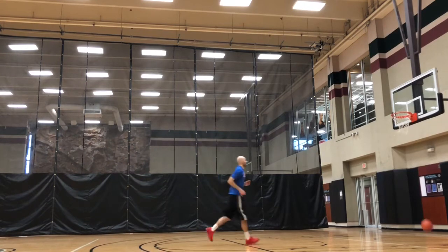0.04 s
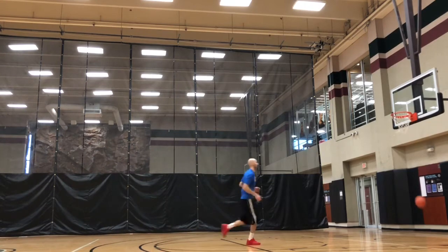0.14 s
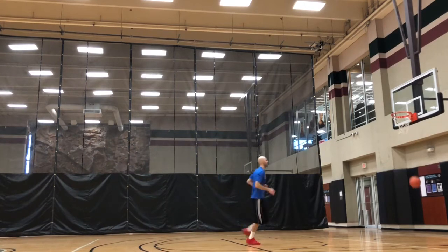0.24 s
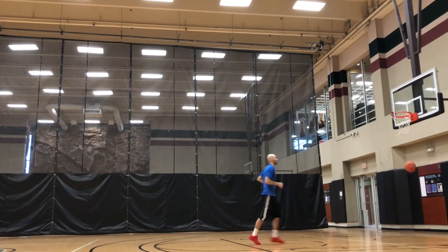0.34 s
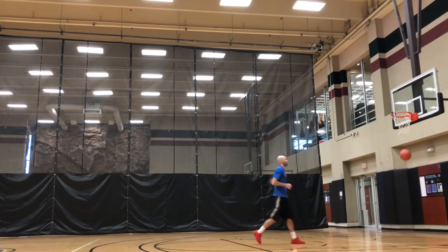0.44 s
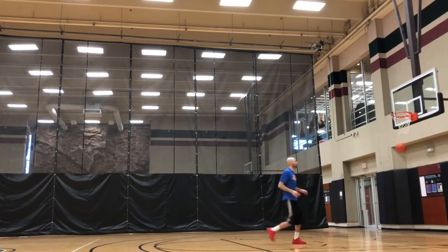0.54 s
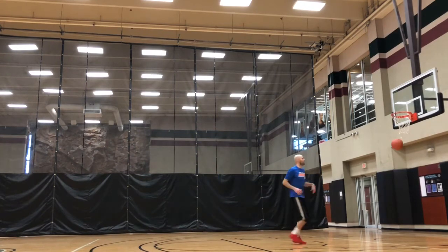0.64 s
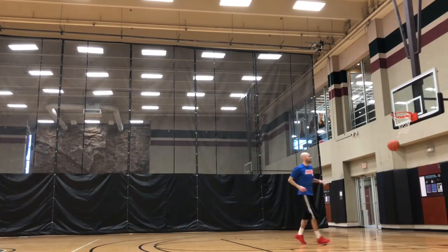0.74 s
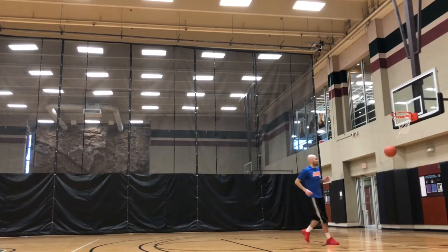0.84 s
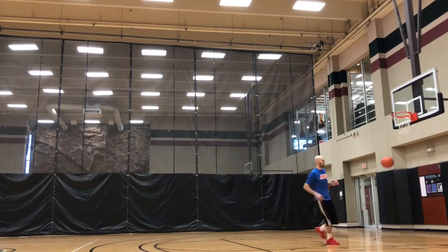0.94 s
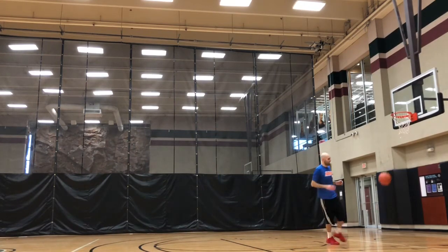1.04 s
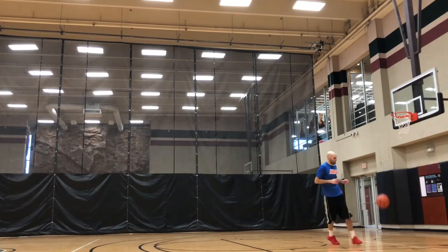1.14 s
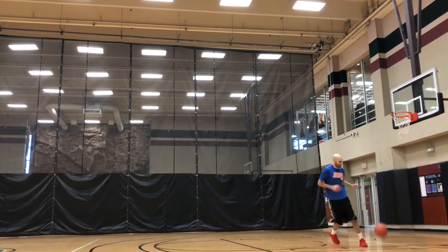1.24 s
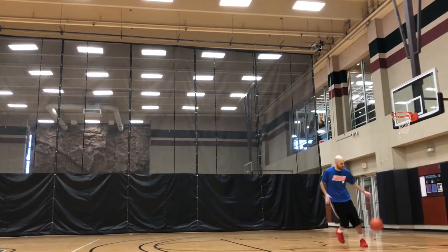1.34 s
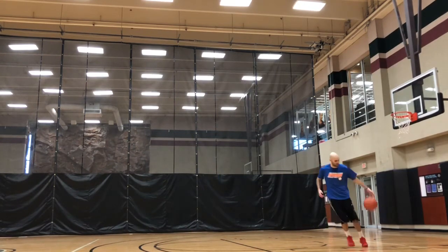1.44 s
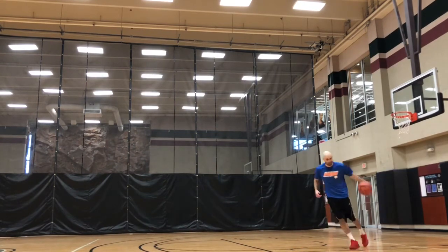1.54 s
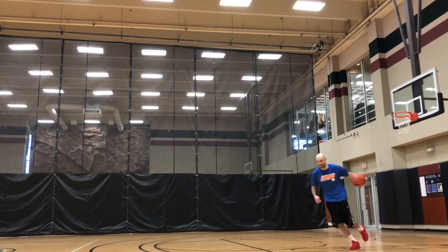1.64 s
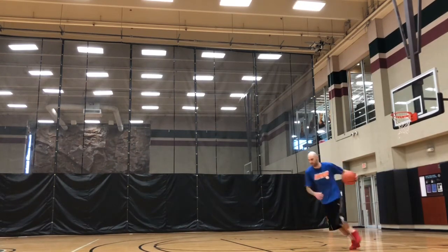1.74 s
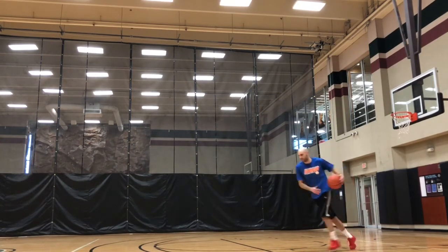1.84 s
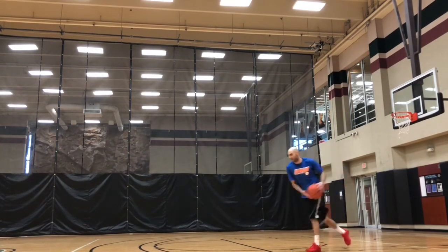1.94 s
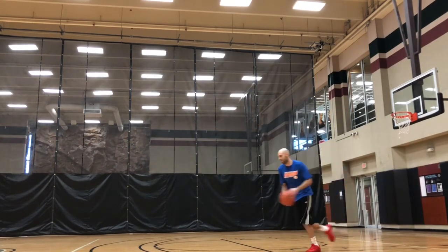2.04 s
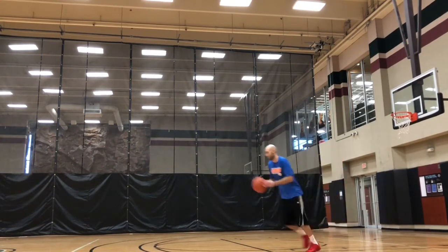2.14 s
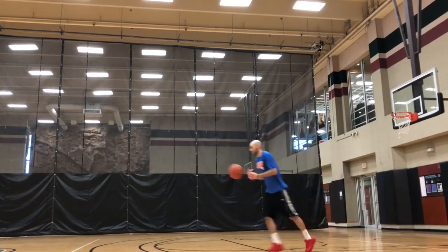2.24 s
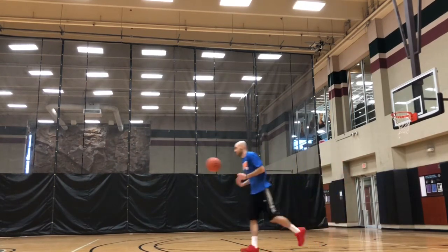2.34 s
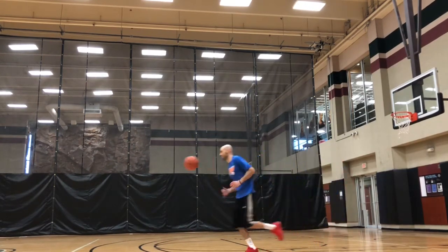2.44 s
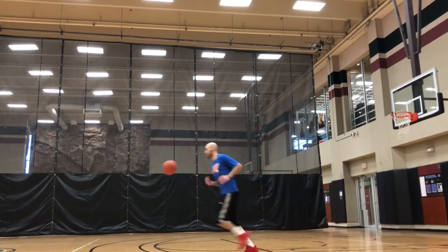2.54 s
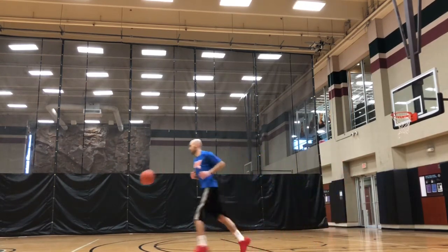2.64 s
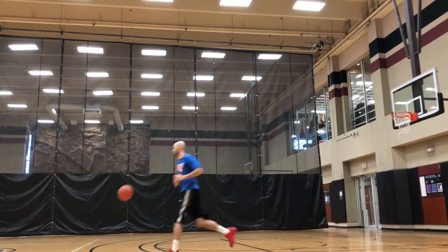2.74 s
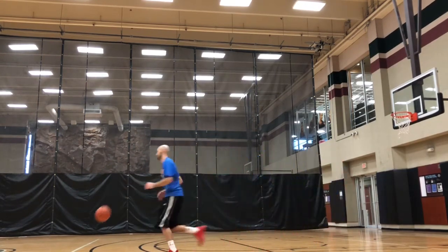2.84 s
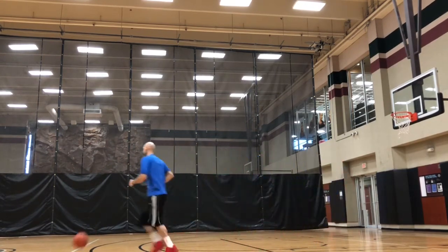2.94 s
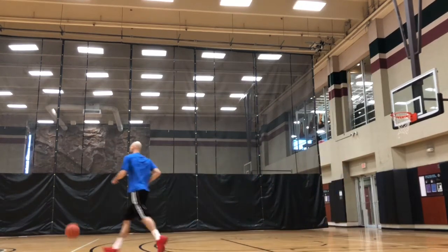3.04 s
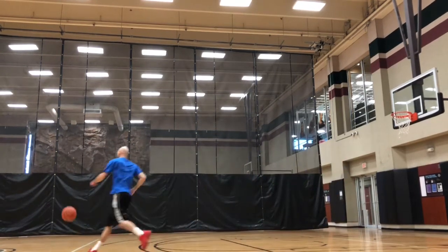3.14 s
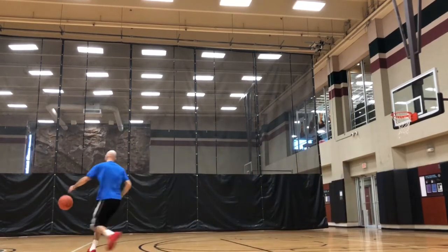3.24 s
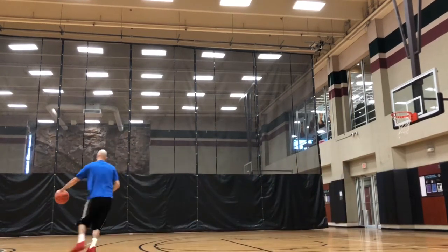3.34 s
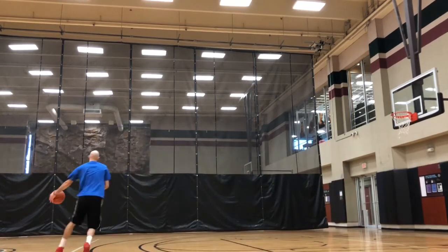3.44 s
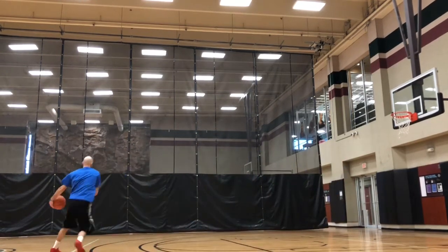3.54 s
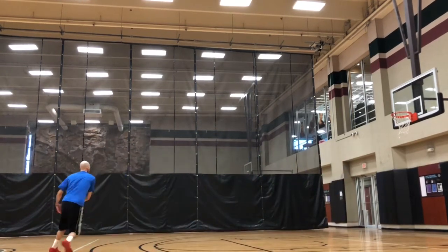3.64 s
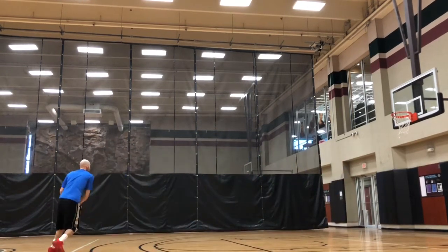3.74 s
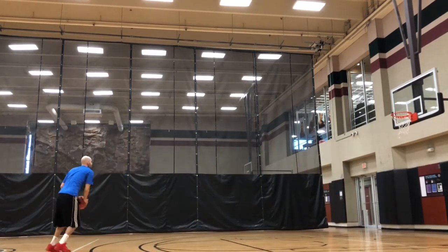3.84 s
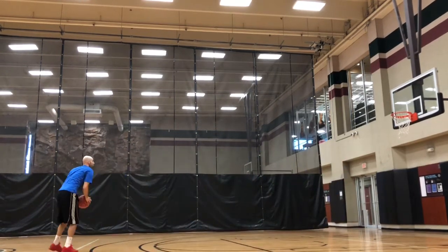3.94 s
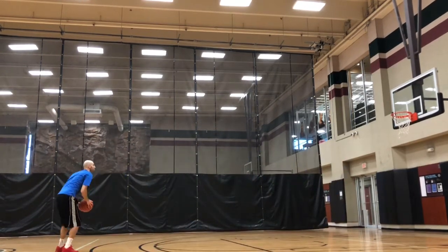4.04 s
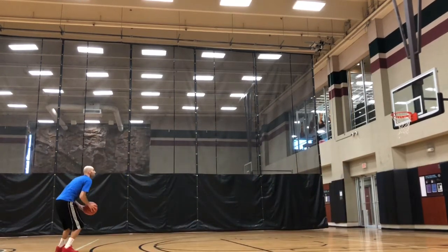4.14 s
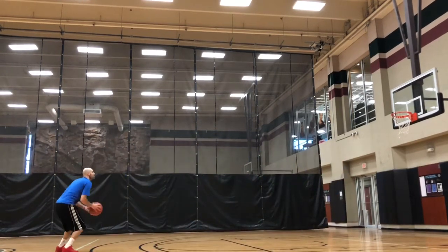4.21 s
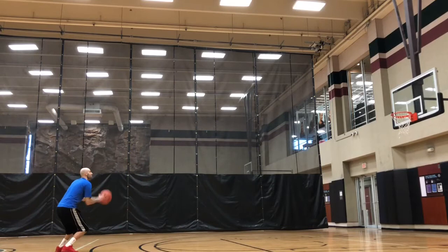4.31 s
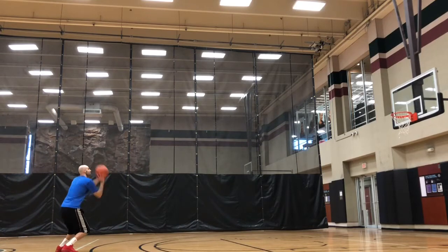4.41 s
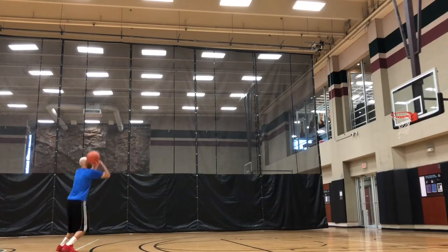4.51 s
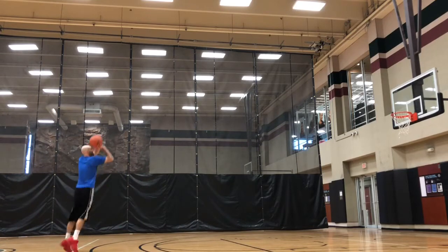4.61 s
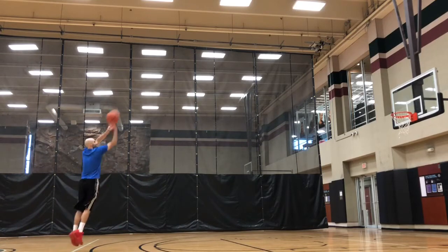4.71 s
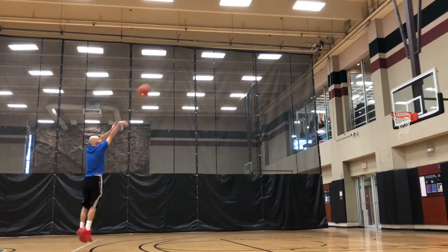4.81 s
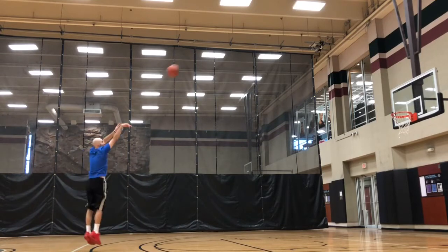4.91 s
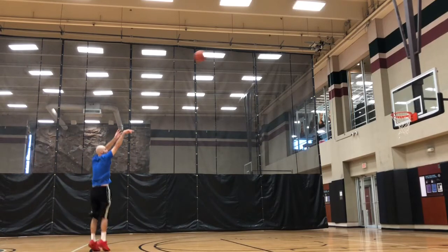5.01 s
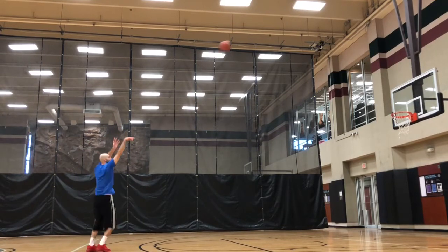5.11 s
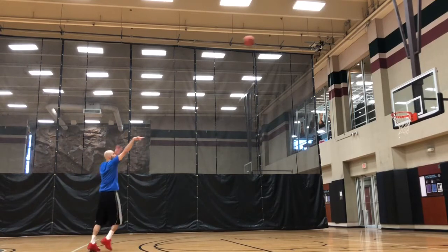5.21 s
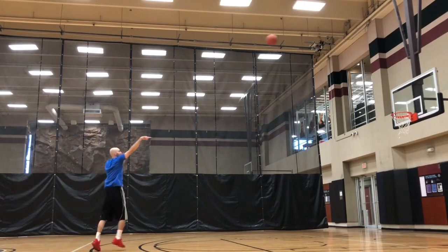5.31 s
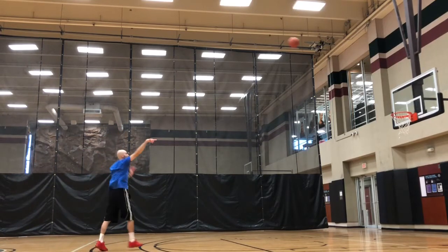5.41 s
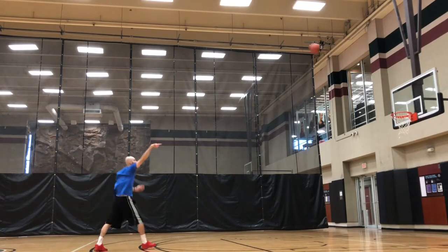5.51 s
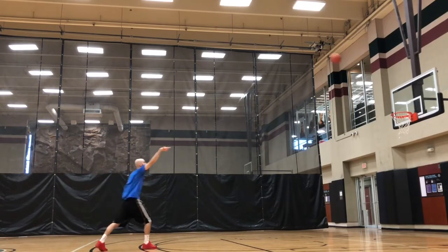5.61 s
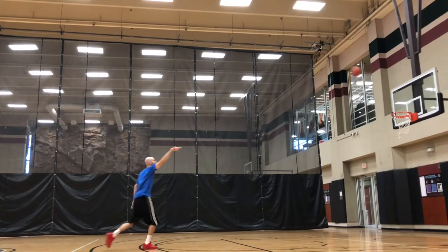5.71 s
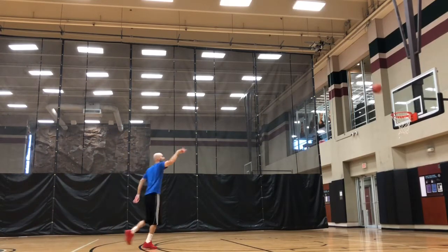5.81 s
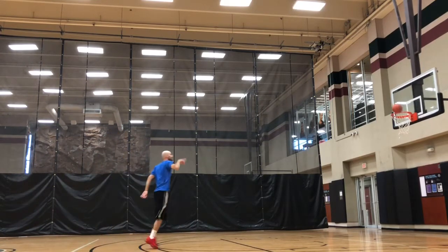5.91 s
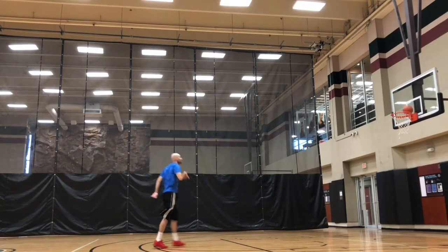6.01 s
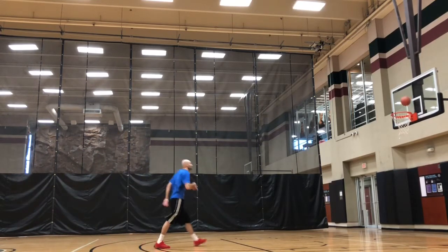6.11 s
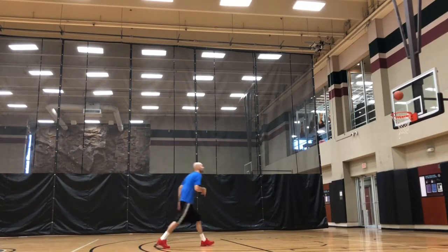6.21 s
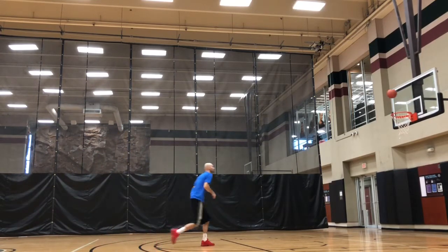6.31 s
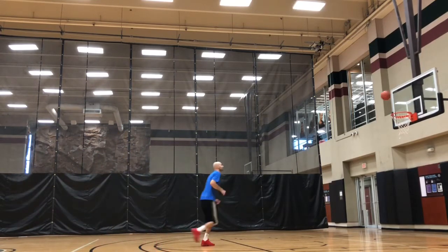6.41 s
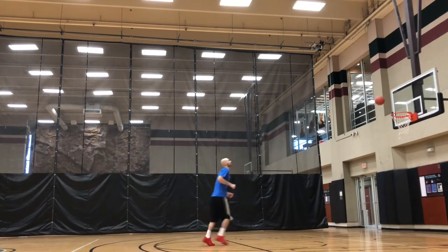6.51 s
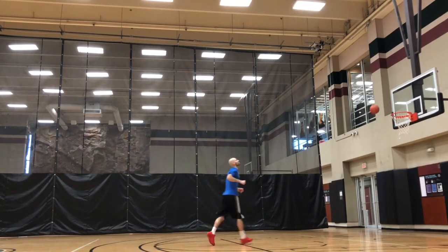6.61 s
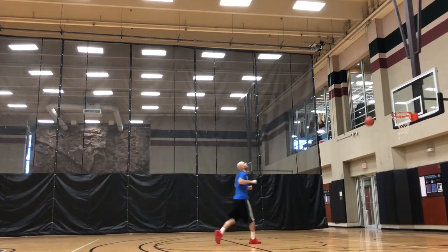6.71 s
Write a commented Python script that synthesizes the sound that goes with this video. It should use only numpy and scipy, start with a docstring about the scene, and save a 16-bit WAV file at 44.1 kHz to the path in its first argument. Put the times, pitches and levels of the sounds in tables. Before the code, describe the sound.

A basketball bounces three times on a wooden floor in a large empty gym, each sharp slap booming and echoing for seconds. Much softer footsteps, hand pats on the ball and swishing clothes follow the player, who lands from a jump with a thud. Then the ball hits the rim with a rattling clang that rings on. Ventilation rumbles quietly throughout, heard from near the floor.

```python
"""A basketball bounces three times in a big empty gym: its skin slaps, its shell rings, the sprung floor booms.
A player jogs after it with thudding soles and swishing clothes, catches it, jumps, shoots and lands.
The ball slams the steel rim: the hinge clatters, the backboard clanks and the ring sings on.
Every hit hangs in the hall for seconds, over a bed of ventilation rumble and faint lamp whine."""
import sys
import numpy as np
from scipy import signal
from scipy.fft import rfft, irfft, next_fast_len
from scipy.io import wavfile

SR = 44100
rng = np.random.default_rng(int(sys.argv[2]) if len(sys.argv) > 2 else 0)


def to_wav(s):
    """Save 16-bit WAV."""
    ch = np.atleast_2d(s).T  # columns
    pcm = np.round(np.clip(ch, -1, 1) * 32767)  # PCM
    wavfile.write(sys.argv[1], SR, pcm.astype(np.int16))


N = 297932

# Levels in the tables are relative; each layer sets its own gain.
# rumble of the ventilation: (frequency [Hz], level [dB])
VENT_COLOUR = [(15, -39), (25, -8), (80, 3), (127, -8.5), (206, -7), (384, -18), (516, -14.5), (575, -15.5),
               (1230, -26.5), (1940, -32.5), (2690, -35.5), (5140, -44), (7310, -53.5), (11000, -56.5),
               (16000, -57)]
# length of the hall's tail: (frequency [Hz], t60 [s])
HALL_DECAY = [(60, 3), (130, 2.5), (300, 3), (600, 4), (1300, 4.5), (2000, 3.5), (2800, 2.5), (4000, 1.8),
              (5500, 1.11), (8000, 0.94), (11000, 0.7), (14000, 0.7)]
# tone of the hall's tail: (frequency [Hz], level [dB])
TAIL_COLOUR = [(60, 3.5), (130, 7), (400, 4), (900, 6), (1900, -1.5), (3600, -4.5), (7000, -8.5),
               (14000, -16.5)]
# soft thud of a sole or a hand: (frequency [Hz], level [dB])
THUD_COLOUR = [(50, 11.5), (150, 13.5), (500, 15), (1000, 13), (2000, 11.5), (4500, 2), (8000, -11.5),
               (15000, -23.5)]
# footfalls: (time [s], level [dB], scuff t60 [s], brightness [dB/octave])
FOOTFALLS = [(0.527, -55, .14, 3.5), (2.040, -38.5, 0.058, -1.2), (2.827, -42, 0.061, 0.7),
             (3.616, -44, 0.29, -1.5), (5.1013, -35.5, 0.034, 0.5), (5.108, -39, 0.037, 0.5),
             (5.4907, -48, 0.21, -0.5)]
# hands on ball and clothes: (time [s], level [dB], brightness [dB/octave])
HAND_PATS = [(2.458, -36, -1.5), (2.883, -50, 4.5), (3.245, -30, -3), (4.053, -35, -1.6),
             (4.288, -56.5, 10), (4.830, -54, 9.5), (5.2384, -48, 3)]
# clothes swishing on the run: (time [s], length [s], level [dB])
CLOTH_SWISHES = [(0.86, 0.13, -66), (1.208, 0.18, -63), (2.302, 0.26, -64), (3.599, .45, -58.5),
                 (4.098, 0.57, -67)]
# hiss of rubbing cloth: (frequency [Hz], level [dB])
CLOTH_COLOUR = [(500, -5), (2500, 7.5), (6000, 2.5), (9000, -11), (15000, -11)]
# soles skidding, and the ball on the steel: (time [s], length [s], pitch [Hz], width [Hz], level [dB])
RUBBER_SKIDS = [(3.763, 0.41, 5260, 620, -59.5), (6.119, 0.027, 6400, 700, -38.5),
                (6.168, 0.032, 6800, 800, -42)]
# blows on the rim and its hinge: (time [s], clank level [dB], clatter level [dB], clatter t60 [s])
RIM_HITS = [(6.0172, -32.5, -32, 0.021), (6.0291, -24, -32, .09), (6.0412, -22, -34, .055),
            (6.0479, -15.5, -19, 0.04), (6.0936, -15.5, -30.5, 0.06), (6.1357, -21.5, -25, 0.03),
            (6.1764, -25, -35, .035)]
# crowded resonances of backboard and frame: (frequency [Hz], level [dB])
BACKBOARD_COLOUR = [(30, -7), (58, 7), (95, -1.5), (140, 1), (200, 0.5), (440, 1.5), (530, 1.5), (670, 3.5),
                    (850, 1), (1100, -2.5), (1400, -5), (1750, -12), (2700, -18.5), (4500, -24),
                    (9000, -41)]
# bright clatter of the hinge: (frequency [Hz], level [dB])
HINGE_COLOUR = [(200, -11), (1200, 3), (2000, -10), (3400, -0.5), (4300, -9.5), (5200, -1), (6800, -6.5),
                (8500, -11), (15000, -24.5)]
# steel ring and its bracket: (frequency [Hz], level [dB], t60 [s])
STEEL_MODES = [(141.9, -26, 1.1), (245.6, -28.5, 0.57), (335, -27, 1.4), (360, -25.5, 1.4),
               (445.6, -26, 2.3), (477, -33, 1.6), (621, -23.5, 2.5), (660, -22, 1.5), (685, -28, 3),
               (720, -25.5, 2), (747, -30, 3.2), (819, -28, 2.3), (1050, -23.5, 0.87), (1076, -20, 0.46),
               (1300, -35, 1.9), (1455, -23.5, 0.44), (1660, -54, 1.8), (1916, -47, 2.8), (1955, -43, 2.1),
               (2780, -40, 1), (2840, -45, .9), (3520, -49, .9), (4810, -54, .8), (6280, -50, .7),
               (6600, -46, 0.82), (6790, -46, .8)]
# boards and skin shuddering after the crack: (frequency [Hz], level [dB])
BOARD_COLOUR = [(100, -15), (300, 21), (600, -8), (1000, 8), (1700, -4), (3500, -27.5), (7000, -22),
                (15000, -24)]
# tick of the pebbled skin meeting the varnish: (frequency [Hz], level [dB])
PEBBLE_COLOUR = [(2000, -20), (7000, 0), (12000, 0), (16000, -2)]
# one slap, with a low hump from the floor and a high one from the skin: (frequency [Hz], level [dB])
SLAP_COLOUR = [(25, -14), (58, 34), (120, 34), (165, 25.5), (310, 21), (500, 20.5), (700, 13.5), (980, 14),
               (1350, 22), (2200, 18.5), (3400, 19), (5000, 7.5), (7800, 9.5), (15000, -8)]
# the ball's shell and the air inside it: (frequency [Hz], level [dB], t60 [s])
SHELL_MODES = [(181.6, -26.5, 0.21), (279.4, -23.5, 0.12), (466, -29, 0.18), (569, -25, 0.082),
               (839, -32, 0.13), (1116, -31.5, 0.15), (1198, -33.5, 0.12), (1327, -34.5, 0.12),
               (1420, -25.5, 0.056), (1525, -33, 0.12), (1880, -51, 0.09), (2920, -35, 0.079),
               (3660, -35, 0.092)]
# the ball on the floor: (time [s], level [dB], brightness [dB/octave], floor boom [dB], skin ping [dB],
# hall send [dB], lag of the quick second slap at lift-off [s], far wall lag [s])
FLOOR_BOUNCES = [(0.1162, 1.5, -0.8, 0.5, 0.5, 0.3, .0153, .033),
                 (1.379, -2, 0.08, 7, -0.5, -1.96, 0.0095, .0264),
                 (3.0705, -6, -1.5, -1, -7.5, 2.5, 0.009, .043)]


def amp(db):
    """Decibels to gain."""
    return 10 ** (np.asarray(db) / 20)


def unit_rms(x):
    """Scales to rms 1."""
    return x / np.sqrt(np.mean(x ** 2) + 1e-20)


def curve(points, hz):
    """Reads a table on a log-frequency axis."""
    f, value = np.transpose(points)
    return np.interp(np.log(hz + 1), np.log(f + 1), value)


def seconds(length):
    """A time axis."""
    return np.arange(int(length * SR)) / SR


def decay(t, t60):
    """An envelope that falls 60 dB in t60 seconds."""
    return 1e-3 ** (t / t60)


def add(mix, start, sound):
    """Mixes a sound in at a start time, which may lie before zero."""
    at = round(start * SR)
    sound, part = sound[max(-at, 0):], mix[max(at, 0):]
    part[:len(sound)] += sound[:len(part)]


def octaves(hz):
    """Octaves above the midrange pivot of the brightness tilt."""
    return np.log2((hz + 20) / 500)


def noise(colour, size, tilt=0):
    """Coloured noise of rms 1, tilted in dB per octave."""
    padded = next_fast_len(size)
    hz = np.fft.rfftfreq(padded, 1 / SR)
    white = rng.standard_normal((len(hz), 2)) @ [1, 1j]
    eq = amp(curve(colour, hz) + tilt * octaves(hz))
    return unit_rms(irfft(white * eq, padded)[:size])


def burst(colour, t60, tilt=0):
    """Crowded resonances, struck together and dying together."""
    return noise(colour, SR, tilt) * decay(seconds(1), t60)


def ring(modes, t):
    """Separate modes dying at their own speeds."""
    return sum(amp(db) * decay(t, t60) * np.sin(2 * np.pi * (hz * t + rng.random()))
               for hz, db, t60 in modes)


def whistle(hz, width_hz, size):
    """Noise in one narrow resonance."""
    detune = (np.fft.rfftfreq(N, 1 / SR) - hz) / (width_hz / 2)
    return unit_rms(irfft(rfft(rng.standard_normal(N)) / (1 + detune ** 2), N))[:size]


def room_tone(vent_db=-39, lamp_db=-84, lamp_hz=10869):
    """The bed: ventilation rumble and the thin whine of the lamps."""
    return amp(vent_db) * noise(VENT_COLOUR, N) + amp(lamp_db) * whistle(lamp_hz, width_hz=70, size=N)


def hall(sound, onset_db=-13, build_s=0.035, early_db=1, early_s=0.089, grain_db=7, grain_s=0.15,
         swell_db=1, swell_at_s=0.22, swell_width_s=0.066):
    """The gym's reverb: separate reflections thicken into a wash, and the treble dies first."""
    t = seconds(4)
    # early on, a few paths are much stronger than the rest
    grain = np.log(amp(grain_db)) * np.exp(-t / grain_s)
    paths = np.clip(rng.standard_normal(len(t) // 40 + 1), -2.5, 2.5)
    paths = np.repeat(paths, 40)[:len(t)]
    reflections = rng.standard_normal(len(t)) * np.exp(grain * paths - grain ** 2)
    hz, frame_times, bands = signal.stft(reflections, SR, nperseg=512)
    t60 = curve(HALL_DECAY, hz)[:, None]
    equal_energy = np.sqrt(2 * np.log(1000) / t60 / SR)
    bands *= amp(curve(TAIL_COLOUR, hz))[:, None] * decay(frame_times, t60) * equal_energy
    tail = signal.istft(bands, SR)[1][:len(t)]
    near_db = onset_db * np.maximum(1 - t / build_s, 0) + early_db * np.exp(-t / early_s)
    # the far walls and the roof answer later, in one soft swell
    far_db = swell_db * np.exp(-((t - swell_at_s) / swell_width_s) ** 2)
    return signal.fftconvolve(sound, tail * amp(near_db + far_db))


def player(sole_lag_s=0.013, sole_db=1, pat_t60=0.04, send_db=1):
    """Foley: feet touch and then land flat, hands pat, cloth swishes, rubber chirps as it skids."""
    out = np.zeros(N)
    for start, db, t60, tilt in FOOTFALLS:
        add(out, start, amp(db) * burst(THUD_COLOUR, t60, tilt))
        add(out, start + sole_lag_s, amp(db + sole_db) * burst(THUD_COLOUR, t60, tilt))
    for start, db, tilt in HAND_PATS:
        add(out, start, amp(db) * burst(THUD_COLOUR, pat_t60, tilt))
    for start, length, db in CLOTH_SWISHES:
        size = int(length * SR)
        add(out, start, amp(db) * noise(CLOTH_COLOUR, size) * np.hanning(size))
    for start, length, hz, width_hz, db in RUBBER_SKIDS:
        size = int(length * SR)
        add(out, start, amp(db) * whistle(hz, width_hz, size) * np.hanning(size))
    return out + amp(send_db) * hall(out)[:N]


def hinge_modes(count=60, low_hz=1300, high_hz=7800, t60=0.21, gain_db=-26):
    """The jangle of the hinge and its spring: many short-lived partials."""
    return [(hz, gain_db + curve(HINGE_COLOUR, hz), t60) for hz in rng.uniform(low_hz, high_hz, count)]


def hoop(clank_t60=0.45, clank_attack_s=0.0017, clank_dry_db=-3, crunch_db=-2.5, send_db=-1.56,
         clatter_boost_db=5, steel_attack_s=0.018, steel_dry_db=0.5, steel_send_db=-14, earlier_db=-19):
    """Blows shake the backboard and clatter the hinge; the hardest clatter sets the steel ring singing."""
    out, t, hinge = np.zeros(N), seconds(1), hinge_modes()
    for start, clank_db, clatter_db, clatter_t60 in RIM_HITS:
        clank = amp(clank_db) * burst(BACKBOARD_COLOUR, clank_t60) * (1 - np.exp(-t / clank_attack_s))
        crunch = amp(crunch_db) * burst(HINGE_COLOUR, clatter_t60)
        clatter = amp(clatter_db) * (crunch + ring(hinge, t))
        add(out, start, amp(clank_dry_db) * clank + clatter)
        add(out, start, amp(send_db) * hall(clank + amp(clatter_boost_db) * clatter))
    hardest_at = max(RIM_HITS, key=lambda hit: hit[2])[0]
    t = seconds(2)
    steel = ring(STEEL_MODES, t) * (1 - np.exp(-t / steel_attack_s))
    add(out, hardest_at, amp(steel_dry_db) * steel)
    add(out, hardest_at, amp(steel_send_db) * hall(steel))
    # the scene opens on the tail of an earlier shot's clank
    add(out, -1, amp(earlier_db) * hall(burst(BACKBOARD_COLOUR, clank_t60)))
    return out


def repeats(liftoff_s, wall_s, roof_s=0.12, gain_db=-13, distance_m=11, sound_m_per_s=343):
    """Lift-off slap, wall echoes of both slaps and roof echo, later ones softer: (lag [s], level [dB])."""
    return [(lag, gain_db - 20 * np.log10(1 + lag * sound_m_per_s / distance_m))
            for lag in (liftoff_s, wall_s, liftoff_s + wall_s, roof_s)]


def scatter(hit, band_hz=(500, 10000), smear_db=-22, smear_t60=0.024):
    """An uneven surface thins a slap and smears it over a few milliseconds."""
    band = signal.butter(1, band_hz, "band", fs=SR, output="sos")
    t = seconds(0.5)
    smear = amp(smear_db) * rng.standard_normal(len(t)) * decay(t, smear_t60)
    smear[0] = 1
    return signal.fftconvolve(signal.sosfilt(band, hit), smear)


def floor_boom(t, hz=92, t60=0.45, attack_s=0.014, gain_db=-19):
    """The sprung floor keeps heaving under the ball."""
    return ring([(hz, gain_db, t60)], t) * (1 - np.exp(-(t / attack_s) ** 2))


def slap(tilt, boom_db, ping_db, boom_hz=90, ping_hz=2150, hump_octaves=0.6,
         lag_1khz_s=0.0011965, dispersion=1.148, longest_s=0.02376):
    """Bending waves in the boards run faster the higher they are: a crack sweeps down into a thump."""
    size = 8192
    hz = np.fft.rfftfreq(size, 1 / SR)
    delay = np.minimum(lag_1khz_s * (1000 / (hz + 1)) ** dispersion, longest_s)
    phase = 2 * np.pi * np.cumsum(delay) * SR / size
    humps = sum(db * np.exp(-(np.log2((hz + 1) / centre) / hump_octaves) ** 2)
                for db, centre in [(boom_db, boom_hz), (ping_db, ping_hz)])
    eq = amp(curve(SLAP_COLOUR, hz) + tilt * octaves(hz) + humps)
    return irfft(eq * np.exp(-1j * phase))[:size // 2]


def bounces(shell_attack_s=0.0037, shudder_db=-20, shudder_t60=0.084, tick_db=-21, tick_t60=0.0053,
            reslap_s=0.0016, reslap_db=-11.5):
    """The ball slaps the floor, rings, and slaps again as it lifts off; far wall, roof and hall answer."""
    out, t = np.zeros(N), seconds(0.5)
    for start, db, tilt, boom_db, ping_db, send_db, liftoff_s, wall_s in FLOOR_BOUNCES:
        hit = ring(SHELL_MODES, t) * (1 - np.exp(-t / shell_attack_s))
        add(hit, 0, slap(tilt, boom_db, ping_db))
        hit *= amp(db)
        add(out, start, hit + amp(db + boom_db) * floor_boom(t))
        add(out, start, amp(db + shudder_db) * burst(BOARD_COLOUR, shudder_t60, tilt))
        add(out, start, amp(tick_db) * burst(PEBBLE_COLOUR, tick_t60))
        add(out, start, amp(send_db) * hall(hit))
        # the ball flattens against the boards and doubles the crack
        add(out, start + reslap_s, amp(reslap_db) * scatter(hit))
        for lag, repeat_db in repeats(liftoff_s, wall_s):
            add(out, start + lag, amp(repeat_db) * scatter(hit))
    return out


def scene():
    """The mono mix, heard from near the floor."""
    return (bounces() + player() + hoop() + room_tone())[None]


def record(dry, low_cut_hz=36, high_cut_hz=16300):
    """Rolls off the deepest rumble, clips at full scale and trims the very top."""
    heard = signal.sosfilt(signal.butter(2, low_cut_hz, "high", fs=SR, output="sos"), dry)
    low_pass = signal.firwin(255, high_cut_hz, window=("kaiser", 8), fs=SR)
    return signal.oaconvolve(np.clip(heard, -1, 1), low_pass[None], "same")


dry = scene()
out = record(dry)
to_wav(out)
```